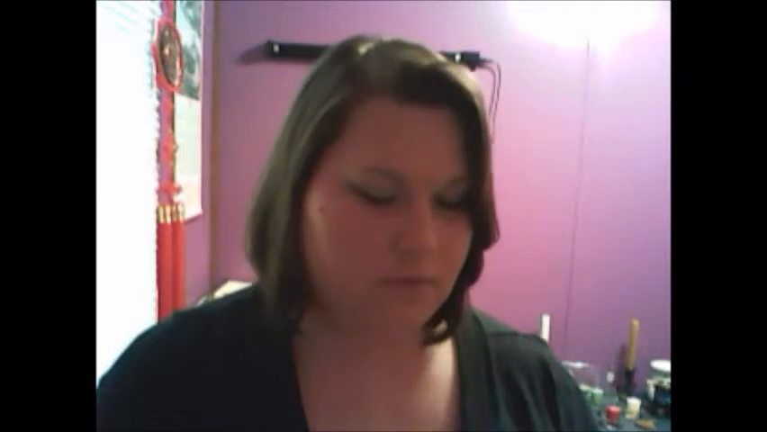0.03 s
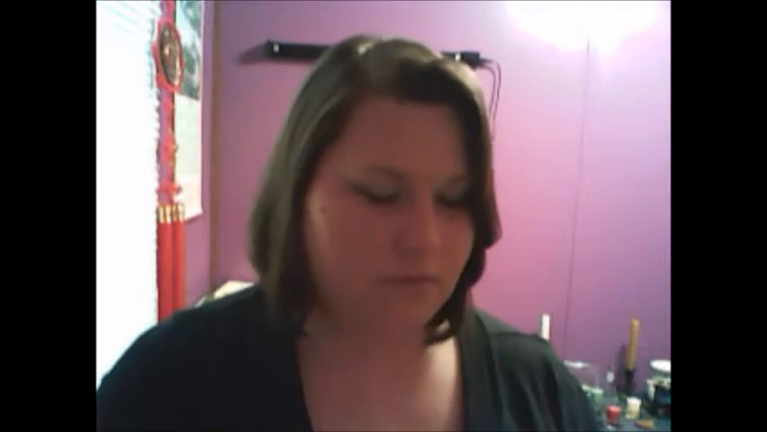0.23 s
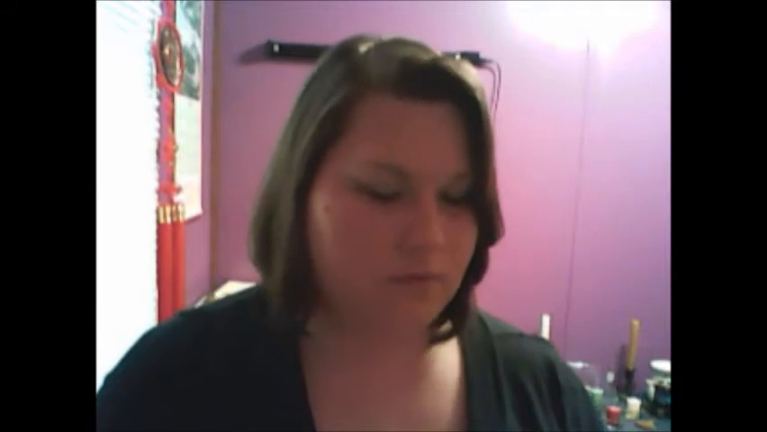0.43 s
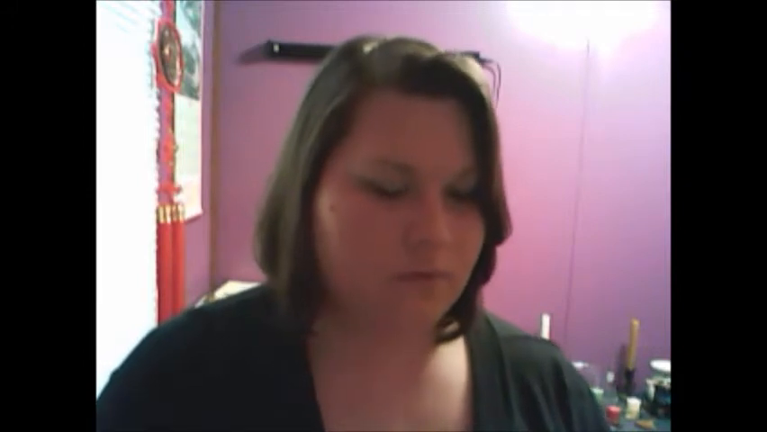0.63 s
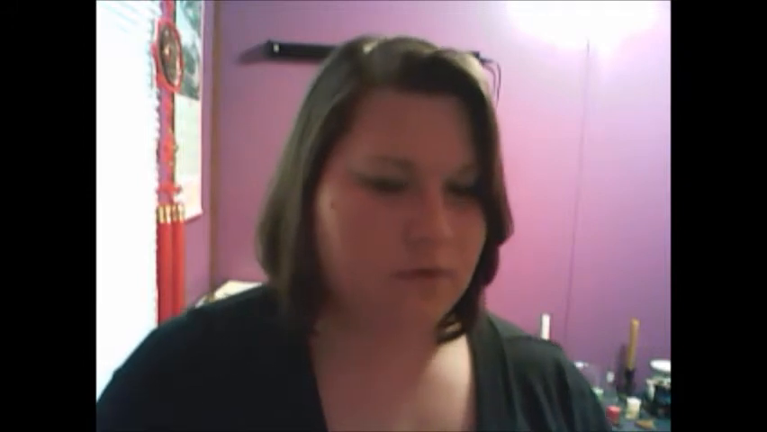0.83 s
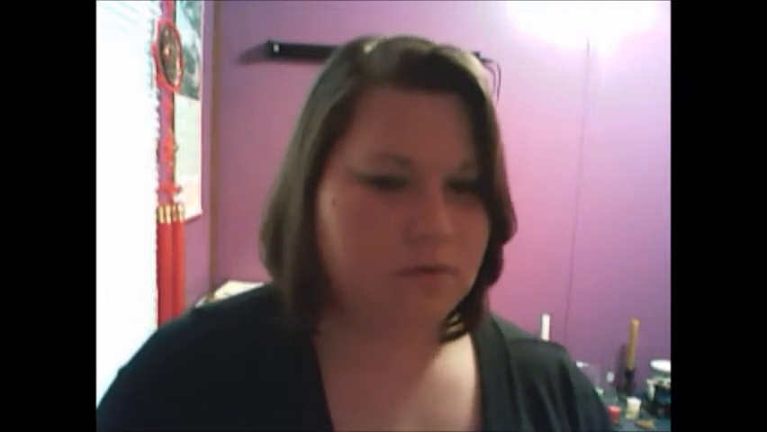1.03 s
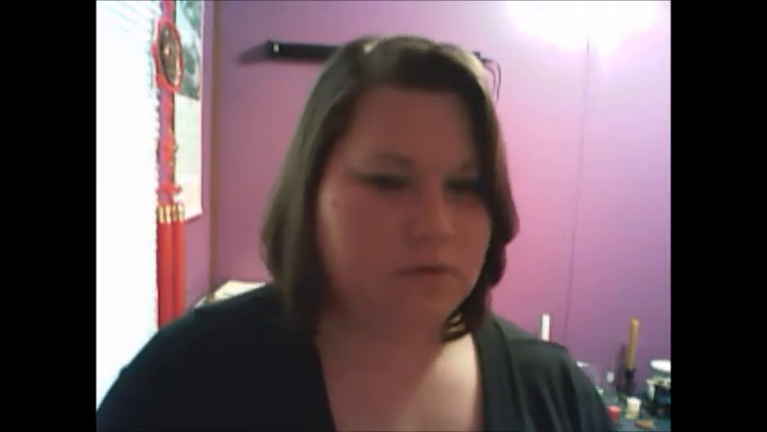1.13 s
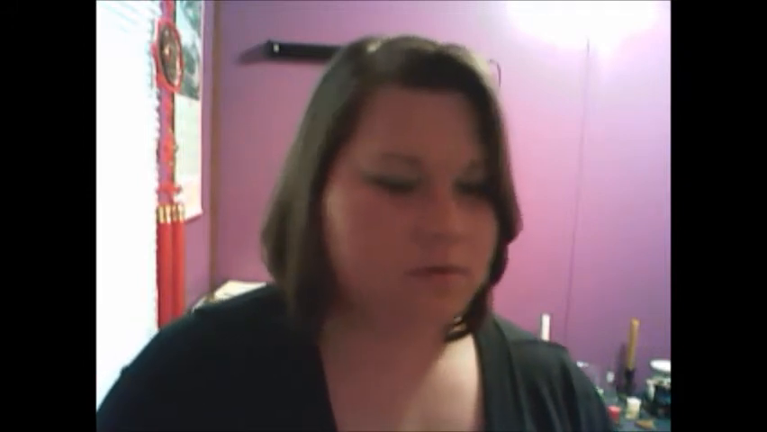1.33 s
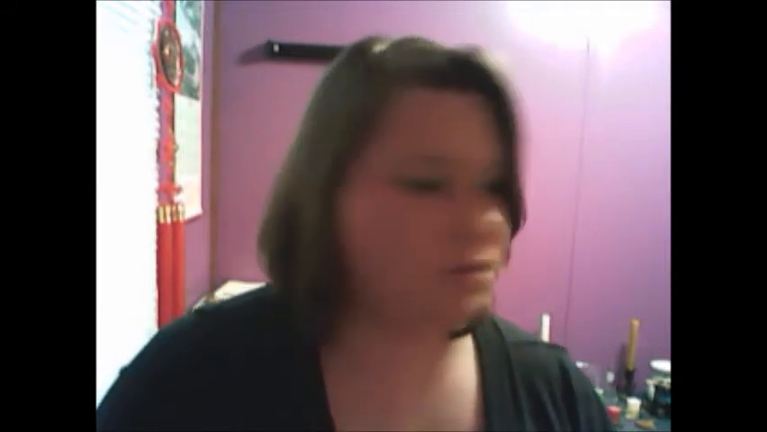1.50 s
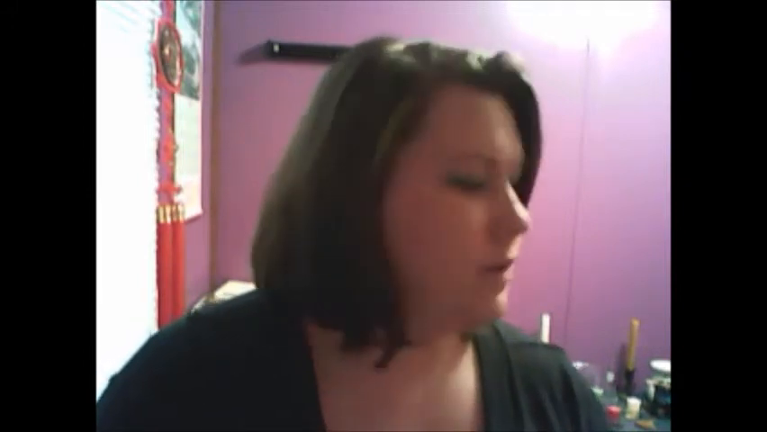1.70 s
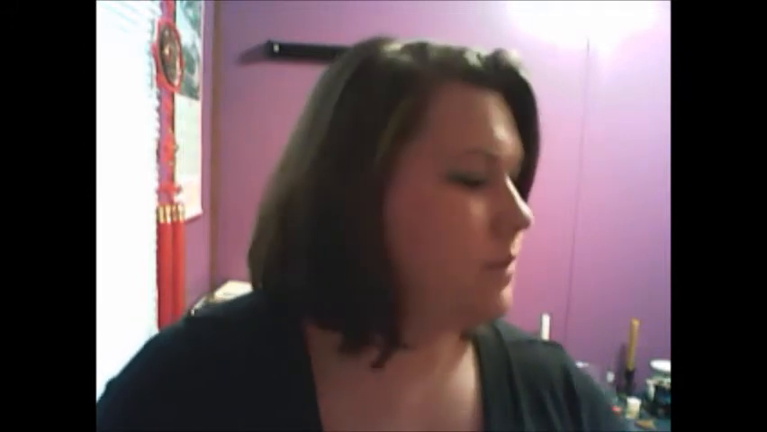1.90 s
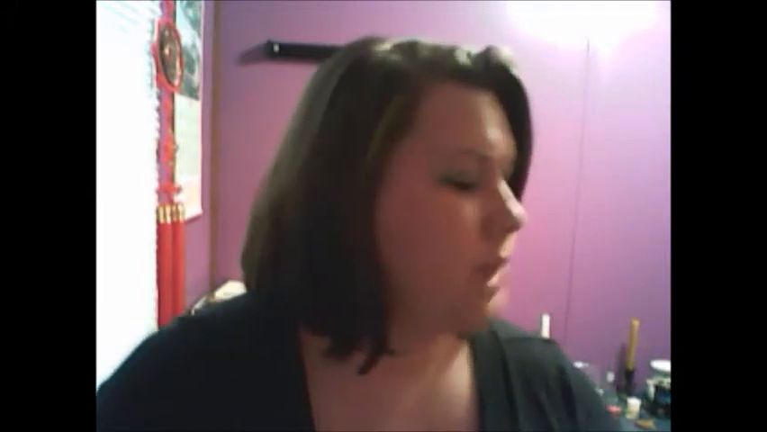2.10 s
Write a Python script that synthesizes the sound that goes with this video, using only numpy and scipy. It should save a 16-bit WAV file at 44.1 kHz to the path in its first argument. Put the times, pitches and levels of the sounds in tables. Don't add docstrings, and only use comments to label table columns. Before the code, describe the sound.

Loud slap and low boom of a book landing on a desk, followed by a small rattle and knock

```python
import sys
import numpy as np
from scipy import signal
from scipy.fft import rfft, irfft, next_fast_len
from scipy.io import wavfile
from scipy.ndimage import map_coordinates

SR = 44100
rng = np.random.default_rng(int(sys.argv[2]) if len(sys.argv) > 2 else 0)


def decibels_to_gain(level_db):
    exponent = np.asarray(level_db, float) / 20
    return 10 ** exponent


def digitize_waveform(pressure):
    field = np.atleast_2d(pressure).T
    bounded = np.clip(field, -1, 1)
    quanta = np.round(bounded * 32767).astype(np.int16)
    wavfile.write(sys.argv[1], SR, quanta)


N = 94991


def unit(x):
    return x / np.sqrt(np.mean(x ** 2) + 1e-20)


def along(points, hz):
    f, v = np.transpose(points)
    return np.interp(np.log(hz + 1), np.log(f + 1), v)


def wobble(rate_hz):
    knots = rng.standard_normal(int(N * rate_hz / SR) + 4)
    return map_coordinates(knots, [np.arange(N) * rate_hz / SR])


def filtered(x, response):
    m = next_fast_len(N + 8192)
    return irfft(rfft(x, m) * response(np.fft.rfftfreq(m, 1 / SR)), m)[..., :N]


def noise(spectrum):
    top_hz = spectrum[-1][0]
    return unit(filtered(rng.standard_normal(N), lambda hz: decibels_to_gain(along(spectrum, hz)) * (hz < top_hz)))


def puff(start_s, db, spectrum, t60_s, lead_s):
    t = np.arange(N) / SR - start_s
    return noise(spectrum) * decibels_to_gain(db - 60 * np.abs(t) / np.where(t > 0, t60_s, lead_s))


def ring(start_s, db, modes, rise_s, scatter_db, bright_hz=20000):
    longest_s = 0.8
    first = int(start_s * SR) + 1
    t = np.arange(first, min(N, first + int(longest_s * SR))) / SR - start_s
    luck_db = scatter_db * rng.standard_normal(len(modes))
    tones = 0
    for (hz, mode_db, t60_s), extra_db in zip(modes, luck_db):
        decay = decibels_to_gain(mode_db + extra_db - 60 * t / t60_s)
        tones = tones + decay * np.sin(2 * np.pi * hz * t) / (1 + (hz / bright_hz) ** 4)
    onset = 1 - np.exp(-(t / rise_s) ** 2)
    return np.pad(decibels_to_gain(db) * tones * onset, (first, N - first - len(t)))


# centre in seconds, half length in seconds, pitch in Hz, level in dB.
WHISTLES = [
    (.2, .08, 2860, -78),
    (.61, .06, 1650, -75),
    (.74, .04, 1650, -77),
    (.94, .09, 1660, -77),
    (1.0, .06, 2850, -78),
    (1.62, .1, 1700, -77),
    (1.99, .03, 1650, -71),
]


def whine():
    t = np.arange(N) / SR
    total = 0
    for centre_s, half_s, hz, db in WHISTLES:
        swell = decibels_to_gain(db + 2 * wobble(45)) * np.exp(-((t - centre_s) / half_s) ** 2)
        phase = 2 * np.pi * np.cumsum(hz + 25 * wobble(130)) / SR
        total = total + swell * np.sin(phase)
    return total


# multiple of shaft speed, level in dB rms.
SHAFT_ORDERS = [(4, -70), (5, -83), (6, -79), (8, -99.5), (9, -91), (10, -80.5), (11, -84.5), (14, -82.5),
                (16, -78.5), (17, -81), (18, -90), (20, -90)]
# pitch in Hz, wander in Hz, level in dB rms.
HUMS = [(91.5, 0.72, -52.5), (72.6, 1.6, -64), (120, 0.57, -69), (330, 1.5, -84)]
# frequency in Hz, density in dB per Hz.
AIR_SPECTRUM = [(18, -7), (35, -4.5), (65, -14.5), (105, -15.5), (135, -20.5), (560, -29), (800, -27),
                (2980, -36.5), (4830, -58.5), (6280, -100)]


def fan():
    shaft_hz = 47.46
    t = np.arange(N) / SR
    turn = 2 * np.pi * shaft_hz * t + 0.05 * wobble(2.4)
    total = whine()
    for order, db in SHAFT_ORDERS:
        level = decibels_to_gain(db + 3 + 1.17 * wobble(2.1))
        total = total + level * np.sin(order * turn + rng.uniform(0, 7.1))
    for hz, wander_hz, db in HUMS:
        level = decibels_to_gain(db + 4 + 1.1 * wobble(6.2))
        phase = 2 * np.pi * np.cumsum(hz + wander_hz * wobble(17)) / SR
        total = total + level * np.sin(phase)
    return total + decibels_to_gain(-59 + 0.5 * wobble(12)) * noise(AIR_SPECTRUM)


# mode in Hz, level in dB, t60 in seconds.
BOOM_MODES = [(32.7, -.5, .39), (57.35, -1, .27), (92.4, -3.5, .4), (141, -7, .16), (164, -11, .2)]
# start in seconds, level in dB.
LIGHT_LOADS = [
    (0.283, -48.5),
    (0.758, -47),
    (1.823, -38.5),
]
# mode in Hz, level in dB, t60 in seconds.
ROCK_MODES = [(38.9, 0, .14), (90, -19, .3), (153, -7, .06)]


def boom():
    rise_s = 0.034
    light = sum(ring(s, db, BOOM_MODES, rise_s, 0.93) for s, db in LIGHT_LOADS)
    book_landing = ring(1.3782, -7.5, BOOM_MODES, rise_s, 0)
    rocking = ring(1.856, -4.5, ROCK_MODES, 0.06, 0)
    return book_landing + light + rocking


# mode in Hz, level in dB, t60 in seconds.
COVER_MODES = [(150, -2.5, .03), (358, 4, 0.023), (464, -2, 0.012), (750, -5.5, 0.02), (1135, 2.5, 0.017),
               (1244, 1.5, .018), (1623, 0, 0.017), (2370, -18.5, 0.01), (2996, -6, .012),
               (4940, -28.5, 0.0089)]
# mode in Hz, level in dB, t60 in seconds.
TOP_MODES = [(190, -1, 0.061), (277, -9, 0.11), (324.5, 1, 0.067), (418, -16.5, .15), (501, -14, 0.073)]
# start in seconds, cover level in dB, desk top level in dB.
BOOK_HITS = [
    (1.3795, -33.5, -33.5),
    (1.3810, -13, -21.5),
    (1.3853, -22.5, -25.5),
    (1.3917, -33.5, -28),
    (1.405, -29.5, -20.5),
]
# frequency in Hz, density in dB per Hz.
PUFF_SPECTRUM = [(120, -18), (200, 5), (445, -5), (1620, -6), (2260, -18), (3200, -26), (3960, -38),
                 (4900, -48), (5500, -74.5)]


def book():
    total = puff(BOOK_HITS[0][0], -19, PUFF_SPECTRUM, 0.1, 0.0017)
    for start_s, cover_db, top_db in BOOK_HITS:
        total = total - ring(start_s, cover_db, COVER_MODES, 0.00041, 1.3)
        total = total - ring(start_s, top_db, TOP_MODES, 0.0021, 2.4)
    return total


# frequency in Hz, t60 in seconds.
WALL_T60 = [(150, .5), (500, 0.3), (1500, 0.33), (3000, 0.2), (5000, 0.3)]
# frequency in Hz, level in dB.
WALL_TONE = [(150, 2.5), (500, -1), (800, 3), (1300, -5), (2500, 3), (5000, -5)]


def walls(x):
    delay_s = 0.007
    hz, t, z = signal.stft(rng.standard_normal(SR // 2), SR, nperseg=256)
    level_db = along(WALL_TONE, hz)[:, None] - 60 * t / along(WALL_T60, hz)[:, None]
    tail = 0.35 * signal.istft(z * decibels_to_gain(level_db), SR, nperseg=256)[1]
    delayed = np.pad(x, (int(delay_s * SR), 0))
    return signal.fftconvolve(delayed, tail / np.sqrt(SR * 0.004))[:N]


# mode in Hz, level in dB, t60 in seconds.
CASE_MODES = [(182, -2.5, 0.17), (270.4, -1.5, 0.048), (455, 5, 0.023), (700, 2.5, 0.0086),
              (1014, 2.5, 0.027), (1274, -5.5, 0.028), (1520, -11.5, 0.019), (2270, -18, 0.019),
              (3260, -26, .012)]
# start in seconds, level in dB.
CASE_HITS = [
    (1.8165, -35.5),
    (1.8206, -40.5),
    (1.8257, -37.5),
    (1.829, -30.5),
    (1.836, -51),
    (1.845, -40),
    (1.853, -41),
]
# frequency in Hz, density in dB per Hz.
GRIT_SPECTRUM = [(150, -36.5), (250, 0.5), (941, -7.5), (1040, -6.5), (1320, -8), (1450, -5), (4830, -55.5),
                 (6280, -83.5), (10600, -120)]


def rattle():
    contents = puff(1.826, -37.5, GRIT_SPECTRUM, 0.23, 0.02)
    return contents + sum(ring(s, db, CASE_MODES, 0.0005, 5.1) for s, db in CASE_HITS)


# mode in Hz, level in dB, t60 in seconds.
BOX_MODES = [(287, -3.5, 0.066), (317, -0.5, 0.038), (508, 8, 0.011), (565, 4.5, 0.019),
             (725, -12.5, 0.045), (1855, -16, .04), (2354, -23.5, 0.061), (2910, -16, 0.026),
             (3506, -27, 0.071), (4380, -30.5, .03)]
# start in seconds, level in dB, brightness in Hz.
BOX_HITS = [
    (1.9666, -31.5, 665),
    (1.972, -37.5, 660),
    (2.0996, -22, 5000),
    (2.105, -27.5, 5000),
]
# frequency in Hz, density in dB per Hz.
SCRAPE_SPECTRUM = [(1200, -16), (1900, -1), (3000, 0), (4000, -2), (4700, -6), (5300, -30)]
# frequency in Hz, density in dB per Hz.
DULL_SPECTRUM = [(200, -48.5), (260, 6.5), (780, -13), (1530, -22), (2030, -25.5), (4830, -46), (6280, -73)]
# start in seconds, level in dB, t60 in seconds.
DULL_BURSTS = [
    (1.973, -49.5, 0.55),
    (2.104, -29.5, 0.17),
]


def knocks():
    start_s, length_s, low_hz = 2.086, 0.01, 231
    u = (np.arange(N) / SR - start_s) / length_s
    slide = np.clip(u, 0, 1) * np.exp(-np.clip(u - 1, 0, None) * 1.3)
    scrape = decibels_to_gain(-55 + 3 * wobble(500)) * slide * noise(SCRAPE_SPECTRUM)
    scrape = scrape + puff(BOX_HITS[-1][0], -59, SCRAPE_SPECTRUM, 0.4, 0.023)
    body = sum(puff(s, db, DULL_SPECTRUM, t60_s, 0.012) for s, db, t60_s in DULL_BURSTS)
    body = body + sum(ring(s, db, BOX_MODES, 0.0013, 1.0, bright_hz) for s, db, bright_hz in BOX_HITS)
    return scrape + filtered(body, lambda hz: 1 / (1 + (low_hz / (hz + 1)) ** 10))


def scene():
    hits = sum(x + decibels_to_gain(-10) * walls(x) for x in (book(), rattle(), knocks()))
    return np.tile(hits + boom() + fan(), (2, 1))


def band_limit(x):
    return signal.sosfilt(signal.butter(12, 15750, fs=SR, output="sos"), x)


MIRRORS_DB = [-51, -55.5, -80, -78]


def record(dry):
    band_hz, image_hz = 5300, 3920
    x = filtered(dry[0], lambda hz: hz < band_hz)
    t = np.arange(N) / SR
    mirrors = sum(decibels_to_gain(db) * np.cos(2 * np.pi * (k + 1) * image_hz * t) for k, db in enumerate(MIRRORS_DB))
    x = x * (1 + mirrors)
    side = decibels_to_gain(-47) * filtered(x * wobble(300), lambda hz: (1 + hz / 1800) * (hz < band_hz))
    pair = np.array([x + side, decibels_to_gain(0.12) * x - side])
    hiss = decibels_to_gain(-99) * rng.standard_normal(N)
    side_hiss = decibels_to_gain(-101) * rng.standard_normal(N) * [[1], [-1]]
    return band_limit(pair + hiss + side_hiss)


dry = scene()
out = record(dry)
digitize_waveform(out)
```